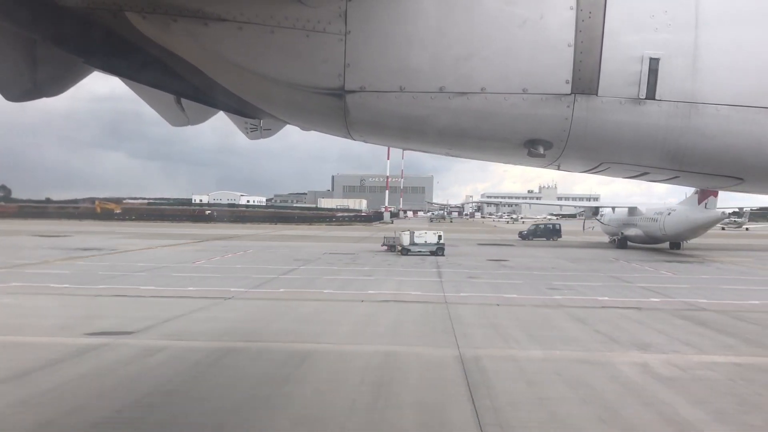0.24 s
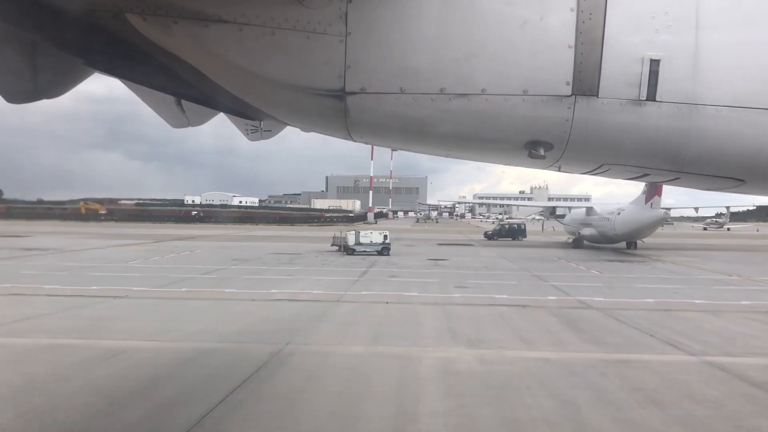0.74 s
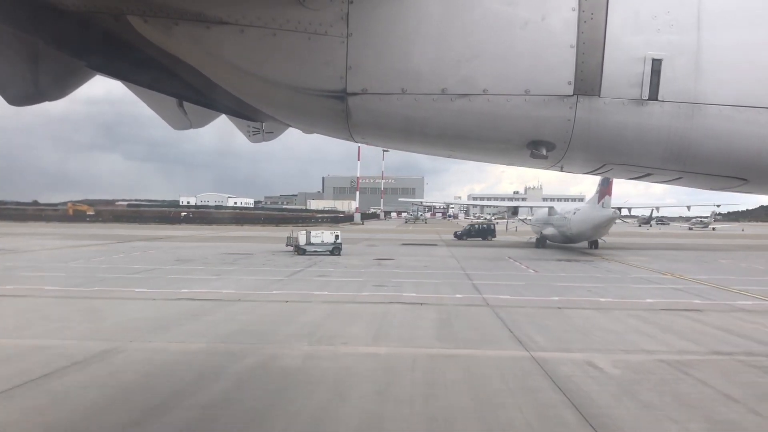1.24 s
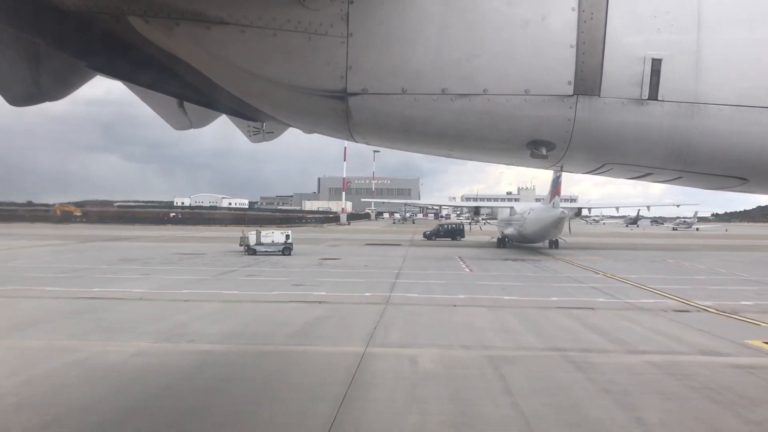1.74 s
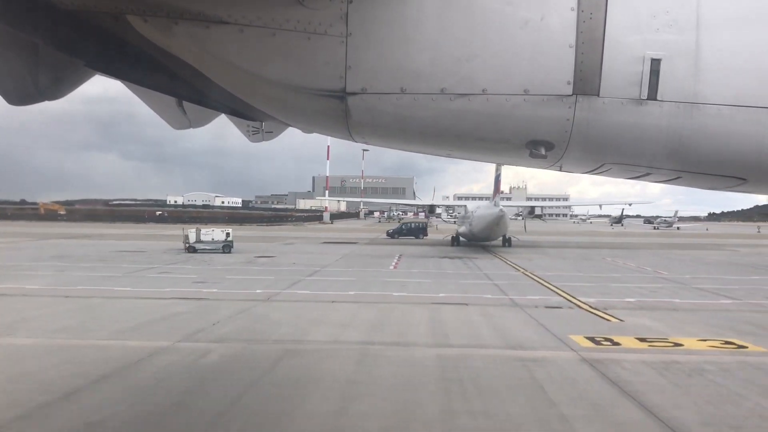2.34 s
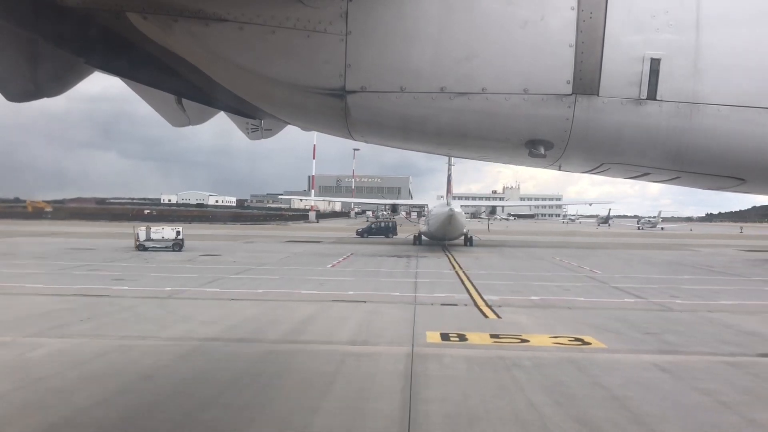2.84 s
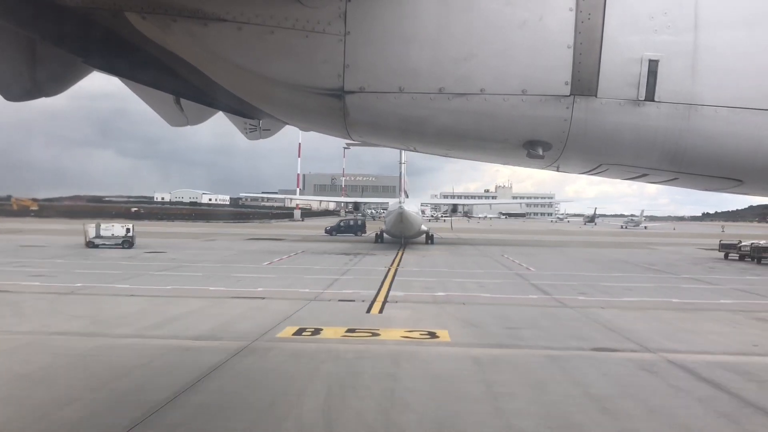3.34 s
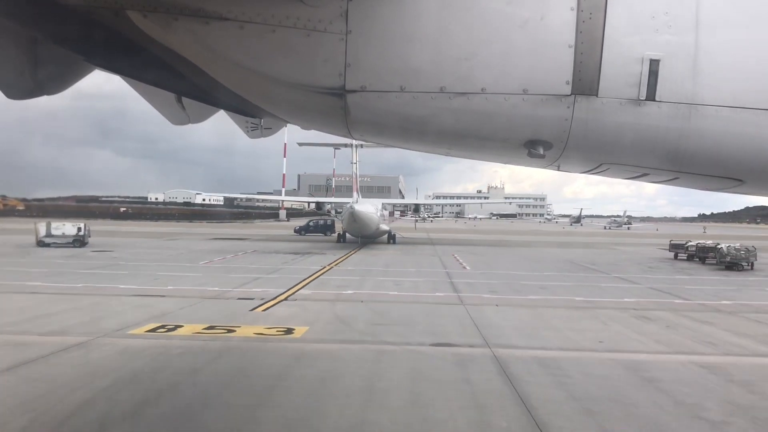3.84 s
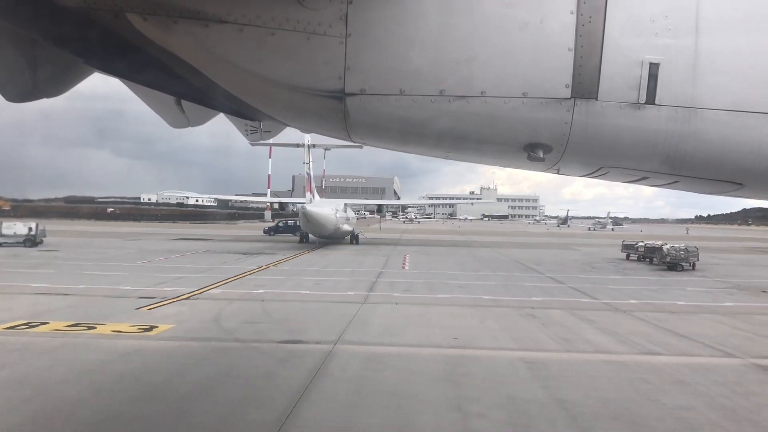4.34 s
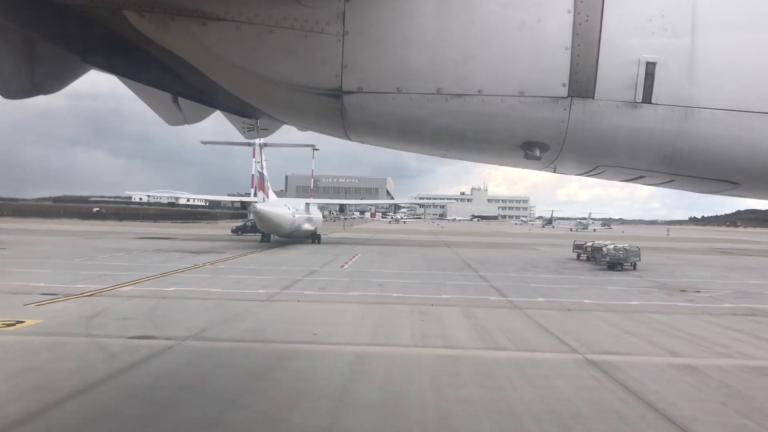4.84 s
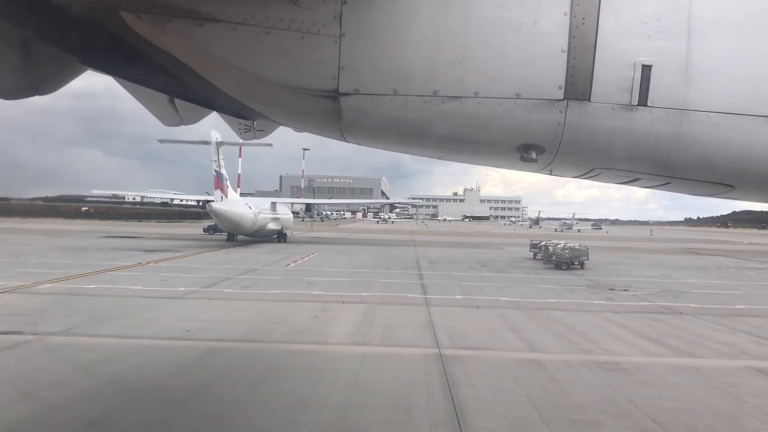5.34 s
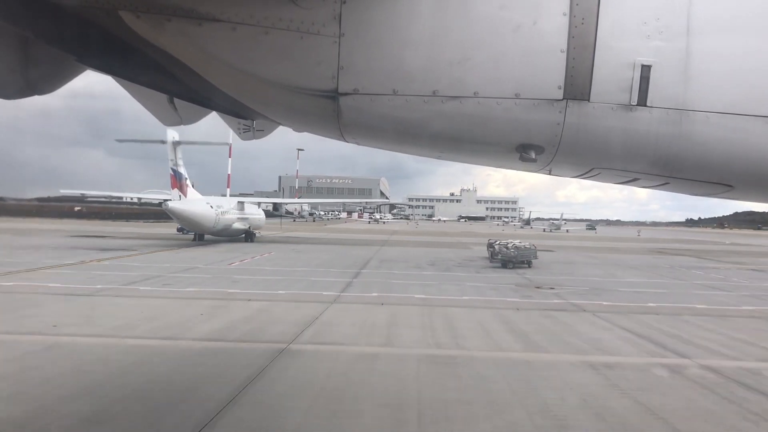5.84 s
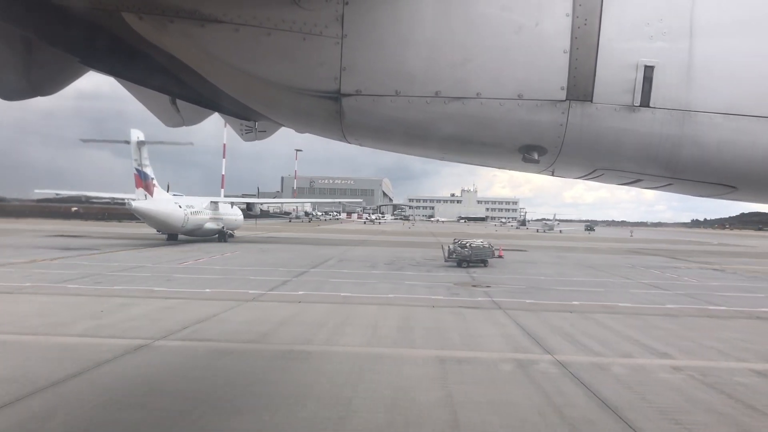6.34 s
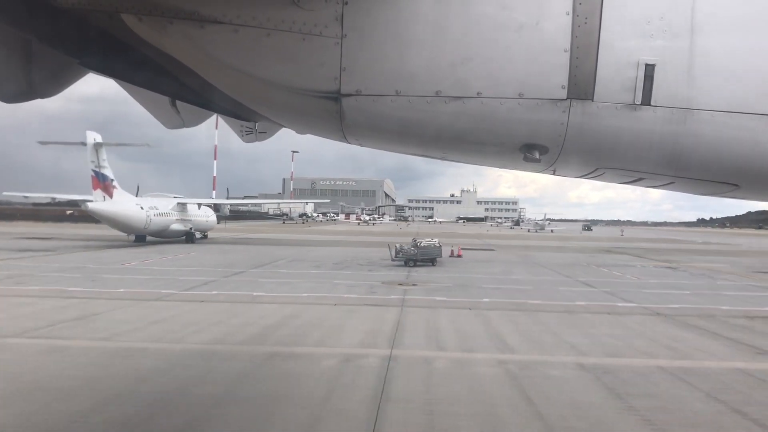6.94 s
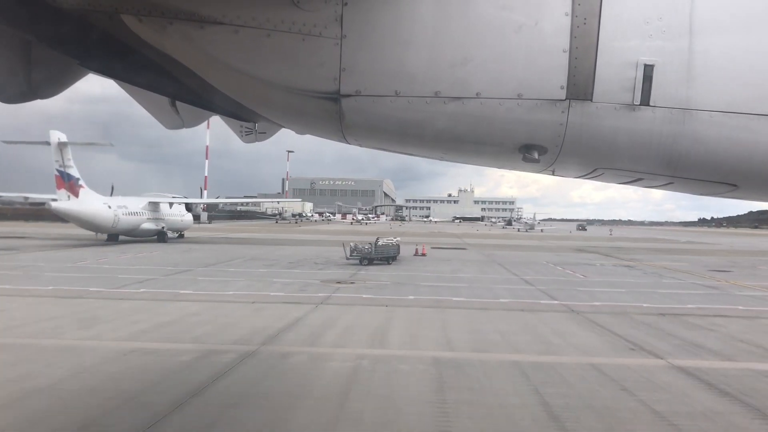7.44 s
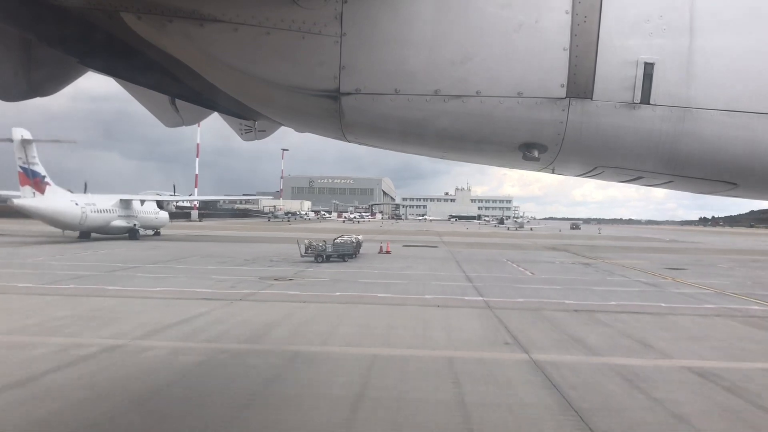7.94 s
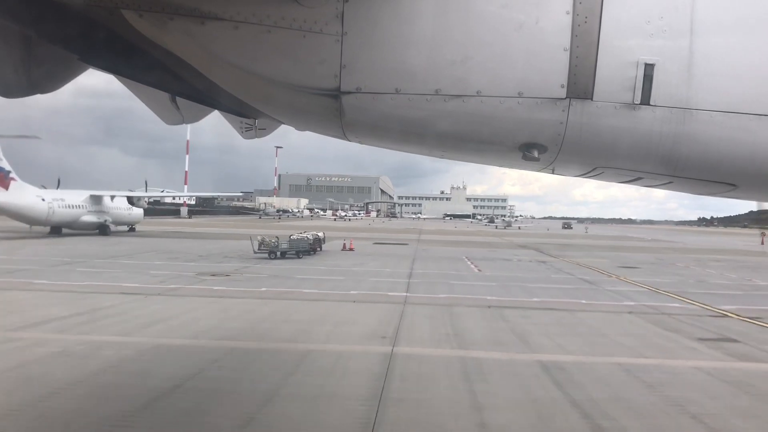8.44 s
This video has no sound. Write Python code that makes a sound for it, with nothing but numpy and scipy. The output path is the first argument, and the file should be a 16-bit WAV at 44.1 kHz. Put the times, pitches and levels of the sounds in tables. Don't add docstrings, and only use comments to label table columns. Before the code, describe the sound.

Inside a small propeller airliner rolling on the apron, a deep fluttering engine drone fills the cabin over dull rumble and faint hiss.

```python
import sys
import numpy as np
from scipy import signal
from scipy.fft import rfft, irfft, next_fast_len
from scipy.io import wavfile

SR = 44100
rng = np.random.default_rng(int(sys.argv[2]) if len(sys.argv) > 2 else 0)


def invert_db(level):
    return 10 ** (np.asarray(level, dtype=float) / 20)


def store_wav(level_fs):
    pcm = np.round(np.clip(np.atleast_2d(level_fs), -1, 1) * 32767)
    wavfile.write(sys.argv[1], SR, pcm.T.astype(np.int16))


N = 382788


def propellers():
    blade_hz = 84.67
    # multiple of the blade rate, level in dB, blur in Hz, steady share 0-1,
    # share of the load swing.
    blade_orders = [(1, -24, 4.7, 0.07, .2), (2, -20, 9.6, 0.07, .2), (3, -24.5, 11.3, 0.07, .6),
                    (4, -36, 6.6, 0.07, 1.5), (5, -36.5, 7.2, 0.07, 1.5)]
    # time in
    # seconds, pitch in Hz, peak level in dB, length in seconds.
    blade_tone_eddies = [(0.344, 167.4, -10, 0.11), (0.49, 164.5, -15.5, 0.069), (0.85, 166.2, -12, 0.074),
                         (1.03, 168.7, -14.5, 0.15), (1.18, 168.7, -17, 0.13), (1.84, 171, -16.5, 0.09),
                         (2.01, 168.6, -12, 0.19), (2.21, 169.6, -14.5, 0.12), (2.43, 167.4, -10, 0.072),
                         (2.77, 169.5, -13.5, 0.13), (2.95, 170.2, -17.5, 0.22),
                         (3.23, 170.1, -12.5, 0.14), (3.36, 164.5, -14, 0.085), (3.55, 169.8, -17, 0.15),
                         (3.82, 167.4, -12, 0.18), (3.98, 168.1, -14.5, 0.17), (4.27, 168.2, -14.5, 0.11),
                         (4.49, 164.1, -13.5, 0.2), (4.78, 168.4, -15, 0.39), (4.99, 170.8, -12.5, 0.079),
                         (5.21, 165, -10.5, 0.17), (5.67, 167.9, -12, 0.087), (6.18, 168.3, -18.5, 0.2),
                         (6.99, 170.1, -13, 0.13), (7.27, 166.6, -15.5, 0.1), (7.43, 164.0, -13.5, 0.13),
                         (7.697, 166.2, -15.5, 0.1), (7.95, 168.6, -16, 0.09), (8.152, 165.5, -10.5, 0.11),
                         (8.51, 172.5, -17.5, 0.17),
                         (0.28, 250.7, -15, 0.17), (0.579, 84.8, -16.0, 0.12), (0.72, 255, -18.5, 0.1),
                         (1.48, 84.1, -18, 0.086), (1.82, 83.4, -17, 0.15), (1.95, 254, -18, 0.096),
                         (2.18, 84.4, -13.5, 0.1), (2.26, 251.1, -18, 0.097), (2.41, 255.2, -18.5, 0.23),
                         (3.04, 86.5, -18, 0.2), (3.25, 83.8, -20.5, 0.17), (3.52, 250.2, -18.5, 0.24),
                         (3.61, 85.3, -17.5, 0.32), (3.76, 250, -17.5, 0.17), (3.98, 246.7, -19, 0.14),
                         (4.392, 88, -17, 0.21), (4.98, 253.7, -16.0, 0.17), (5.261, 82.6, -19, 0.14),
                         (5.48, 82.6, -17.5, 0.089), (5.73, 248.0, -17.5, 0.18), (6.33, 84.5, -14.5, 0.1),
                         (6.41, 248.3, -16, 0.13), (6.841, 250, -17.5, 0.076), (7.44, 82.7, -18, 0.27),
                         (7.74, 251.2, -17.5, 0.12), (8.01, 252, -18.0, 0.13), (8.22, 84.5, -17, 0.3),
                         (8.32, 251.2, -17.5, 0.14), (8.401, 85.5, -19, 0.2), (8.53, 253.4, -18, 0.091)]
    eddies = blade_tone_eddies
    swing_db = load_db()
    out = np.zeros(N)
    for multiple, level_db, blur_hz, steady_share, load_share in blade_orders:
        blade_tone = blurred_tone(multiple * blade_hz, level_db + load_share * swing_db, blur_hz, steady_share)
        own_eddies = [eddy for eddy in eddies if round(eddy[1] / blade_hz) == multiple]
        out += surging(blade_tone, own_eddies)
    return out


def load_db():
    # time in seconds, load in dB.
    load_curve = [(0.0, -25), (0.05, -21.5), (0.19, -22.5), (0.48, -19.5), (0.56, -28), (0.58, -23.5),
                  (1.04, -22), (1.06, -24), (3.6, -21), (4.23, -24), (4.52, -19.5), (4.71, -23),
                  (4.88, -18), (4.91, -20), (5.39, -24.5), (6.36, -22), (6.53, -23), (8.68, -22)]
    db, = in_time(load_curve)
    return db - np.mean(db)


def slipstream_roar():
    roar_db = -15.5
    # frequency in Hz, density in dB per Hz.
    roar_slope = [(25.0, -43), (40.0, -20.5), (60.0, -9.5), (95.0, -6.5), (125.0, -3), (190.0, -7),
                  (290.0, -13), (460.0, -14), (490.0, -20), (900.0, -26), (1250.0, -31.5), (1650.0, -36),
                  (2000.0, -36.5)]
    # centre in Hz, width in Hz, gain in
    # dB.
    roar_humps = [(61.3, 4.9, 4), (79, 22, 4), (92.35, 6.9, -2.5), (113.4, 14, 2.5), (140.3, 6.3, -6.5),
                  (154, 20, 3.5), (222, 8.8, -7.5), (252, 40, 5.5), (342.7, 39, 5), (426, 40, 5),
                  (510, 18, 4), (592, 20, 2.5), (680, 25, 2), (885, 30, 2.5), (1111, 40, 3), (1190, 40, 2),
                   (1534, 150, 4), (1724, 34, 5.5), (1789, 45, 7), (1822, 20, 3)]
    # share of the load swing, own gusting in dB.
    gusting = [
        (0.17, 1.6),
        (0.93, .6),
        (0.49, 0.31),
    ]
    gusts_db = [load_share * load_db() + own_db * drift(3.3) for load_share, own_db in gusting]
    steady_roar = coloured_noise(roar_slope, roar_humps, above=False)
    return invert_db(roar_db) * in_bands(steady_roar, [140, 480], gusts_db)


def engine_shaft():
    # frequency in Hz, level in dB, blur in Hz (below zero: the unsteady part grows towards the end),
    # steady share 0-1.
    shaft_hum = (129, -24.5, -0.1, .5)
    # time in seconds, pitch in Hz, peak level in dB, length in seconds.
    shaft_surges = [(1.12, 124.8, -18, 0.08), (1.45, 121.9, -20, 0.28), (1.84, 126.0, -18, 0.11),
                    (2.13, 123.4, -20, 0.19), (2.28, 119.9, -16.5, 0.049), (2.8, 124.8, -19.0, 0.18),
                    (3.61, 123.2, -18, 0.09), (5.39, 126.2, -19.5, 0.13), (5.81, 124.9, -15, 0.088),
                    (6.36, 128.0, -19, 0.099), (6.55, 127.0, -19, 0.1), (7.06, 126.3, -20, 0.15),
                    (7.54, 128.6, -22, 0.16), (7.85, 127.0, -21.5, 0.28)]
    return blurred_tone(*shaft_hum) + surging(0, shaft_surges)


def gears():
    # time in seconds, pitch in Hz, level in dB.
    mesh_curve = [(0.0, 1883, -60), (0.02, 1879, -49), (0.39, 1879, -45), (0.75, 1878, -50),
                  (0.97, 1878, -47), (2.0, 1878, -50), (2.83, 1879, -47), (6.79, 1881, -44.5),
                  (8.68, 1881, -48.5)]
    # multiple, level in dB against the first.
    mesh_overtones = [(2, -25), (3, -13)]
    # frequency in Hz, level in dB, wander in Hz.
    accessory_tones = [
        (214.7, -33, .6),
        (1033, -52, .8),
    ]
    mesh_hz, mesh_db = in_time(mesh_curve)
    out = tone(mesh_hz, mesh_db + 1.5 * drift(4.8))
    for multiple, relative_db in mesh_overtones:
        out += tone(multiple * mesh_hz, np.mean(mesh_db) + relative_db + 3 * drift(2.5))
    for hz, level_db, wander_hz in accessory_tones:
        out += tone(hz + wander_hz * drift(1.62), level_db + 3 * drift(2.0))
    return out


def ventilation_hiss():
    hiss_db = -36.5
    # frequency in Hz, density in dB per Hz.
    hiss_slope = [(1950, 0.0), (2700, -4.0), (3800, -10.0), (5000, -5.5), (6200, -8.0), (7800, -11.5),
                  (9300, -12.5), (11000, -16.0), (13000, -20.5), (15300, -22.0), (15700, -19.5)]
    # centre in Hz, width in Hz, gain in dB.
    duct_rings = [(2106, 45, 3.5), (2437, 129, 4.0), (2823, 39, 3.0), (3128, 161, 8.5), (3185, 35, -6.0),
                  (3262, 36, 4.0), (3595, 195, 4.5), (4076, 299, 6.0), (4106, 70, 10.5), (4220, 68, 3.0),
                  (4347, 126, 15.0), (4433, 27, -2.5), (4511, 43, 4.5), (4602, 48, 4.0), (5420, 72, 4.0),
                  (5600, 173, 5.0), (6210, 110, -4.5), (6330, 200, 7.0), (6500, 81, 3.5), (6780, 307, 4.0),
                  (7230, 419, 4.5), (8130, 84, 4.0), (8440, 429, 7.5), (8580, 112, 6.5), (9020, 204, 7.0),
                  (9390, 40, 1.5), (10030, 76, 4.0), (10530, 290, 6.0), (12310, 157, 6.5),
                  (13520, 158, 3.5)]
    flicker_db = [depth_db * drift(16) for depth_db in (0.82, 0.65, 0.38, 0.66, 0.78, 0.5)]
    steady_hiss = coloured_noise(hiss_slope, duct_rings, above=True)
    return invert_db(hiss_db) * in_bands(steady_hiss, [2900, 3900, 5800, 7900, 11500], flicker_db)


def blurred_tone(hz, level_db, blur_hz, steady_share):
    wander = np.sqrt((1 - steady_share) / 2) * (drift(blur_hz) + 1j * drift(blur_hz))
    turning = np.exp(2j * np.pi * hz * np.arange(N) / SR)
    return np.sqrt(2) * invert_db(level_db) * np.real((np.sqrt(steady_share) + wander) * turning)


def surging(steady, events):
    bell_stretch, bell_squareness, gain_db = 1.09, 2.9, 0.34
    t = np.arange(N) / SR
    pitch_wobble = 1 + 0.018 * drift(11.9)
    flutter_db = 1.5 * drift(12)
    left, surges = np.ones(N), np.zeros(N)
    for centre_s, hz, peak_db, length_s in events:
        near = slice(max(int((centre_s - 0.5) * SR), 0), int((centre_s + 0.5) * SR))
        offset = 2 * (t[near] - centre_s) / (bell_stretch * length_s)
        bell = 2.0 ** -np.abs(offset) ** bell_squareness
        left[near] *= 1 - bell
        phase = 2 * np.pi * (hz * np.cumsum(pitch_wobble[near]) / SR + rng.random())
        level = invert_db(peak_db + gain_db + flutter_db[near])
        surges[near] += np.sqrt(2) * bell * level * np.sin(phase)
    return left * steady + surges


def tone(hz, level_db):
    turns = np.cumsum(hz + np.zeros(N)) / SR + rng.random()
    return np.sqrt(2) * invert_db(level_db) * np.sin(2 * np.pi * turns)


def coloured_noise(slope, humps, above):
    split_hz = 1950
    size = next_fast_len(N)
    hz = np.arange(size // 2 + 1) * SR / size + 1e-3
    slope_hz, slope_db = np.transpose(slope)
    shape_db = np.interp(np.log(hz), np.log(slope_hz), slope_db, left=-60)
    for centre_hz, width_hz, gain_db in humps:
        shape_db += gain_db * 2.0 ** -(2 * (hz - centre_hz) / width_hz) ** 2
    side = (hz > split_hz) == above
    white = rfft(rng.standard_normal(size))
    return rms_one(irfft(white * invert_db(shape_db) * side, size)[:N])


def in_bands(x, edges_hz, gains_db):
    size = next_fast_len(N)
    band = np.searchsorted(edges_hz, np.arange(size // 2 + 1) * SR / size)
    spectrum = rfft(x, size)
    return sum(invert_db(db) * irfft(spectrum * (band == k), size)[:N] for k, db in enumerate(gains_db))


def drift(rate_hz):
    stride = 40
    settle = 2000
    pole = np.exp(-2 * np.pi * rate_hz * stride / SR)
    coarse = rng.standard_normal(N // stride + settle + 2)
    slow = signal.lfilter([1], [1, -2 * pole, pole * pole], coarse)[settle:]
    return np.interp(np.arange(N) / stride, np.arange(len(slow)), rms_one(slow))


def in_time(rows):
    s, *columns = np.transpose(rows)
    return [np.interp(np.arange(N) / SR, s, column) for column in columns]


def rms_one(x):
    return x / np.sqrt(np.mean(x ** 2) + 1e-20)


def scene():
    mix = propellers() + slipstream_roar() + engine_shaft() + gears() + ventilation_hiss()
    return mix[None, :]


def band_limit(x):
    return signal.sosfilt(signal.butter(12, 15870, fs=SR, output="sos"), x)


def record(dry):
    rounded = dry / (1 + np.abs(dry) ** 4) ** 0.25
    top_cut = signal.ellip(12, 0.3, 80, 15715, fs=SR, output="sos")
    return band_limit(signal.sosfilt(top_cut, rounded))


dry = scene()
out = record(dry)
store_wav(out)
```